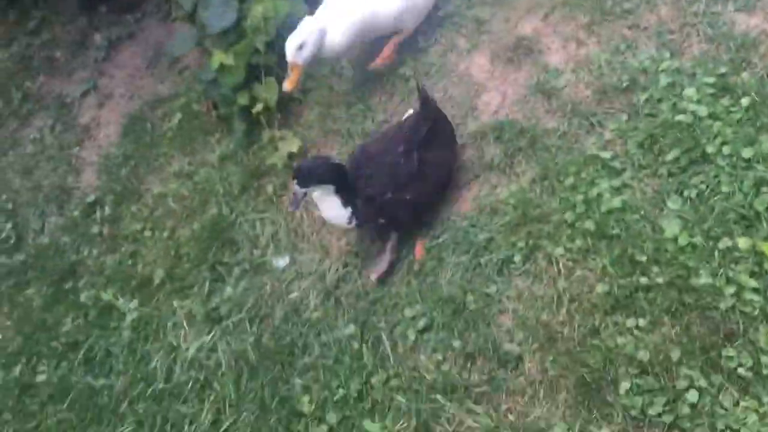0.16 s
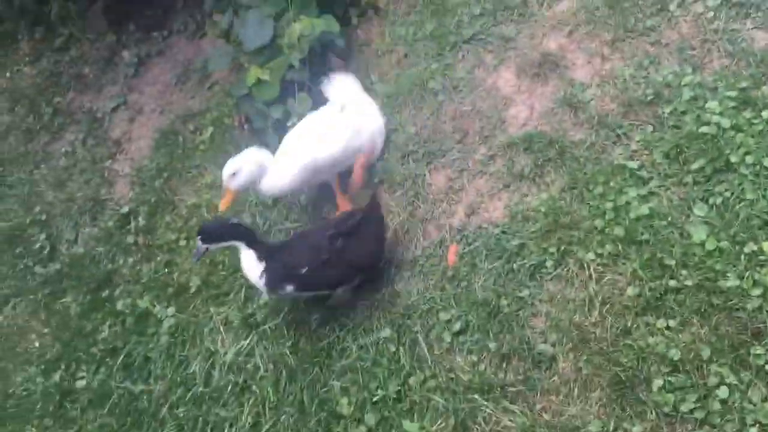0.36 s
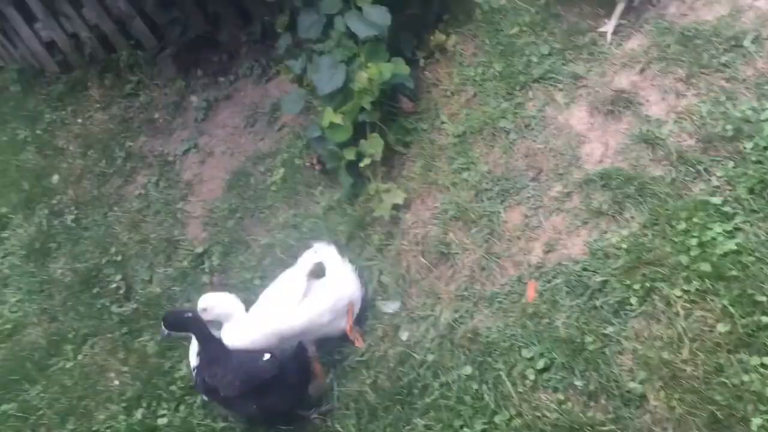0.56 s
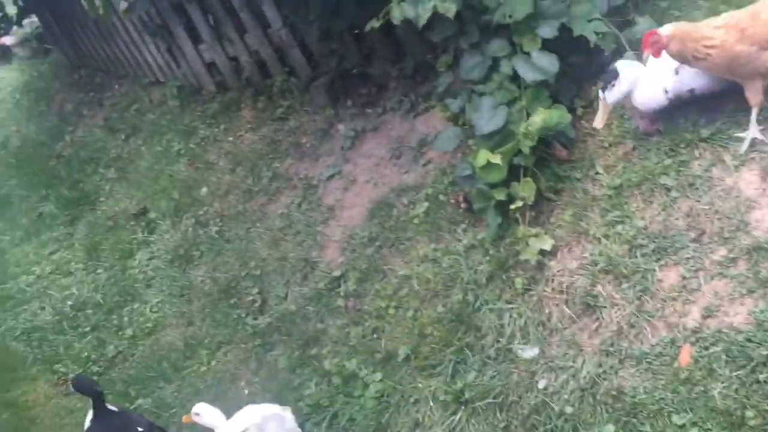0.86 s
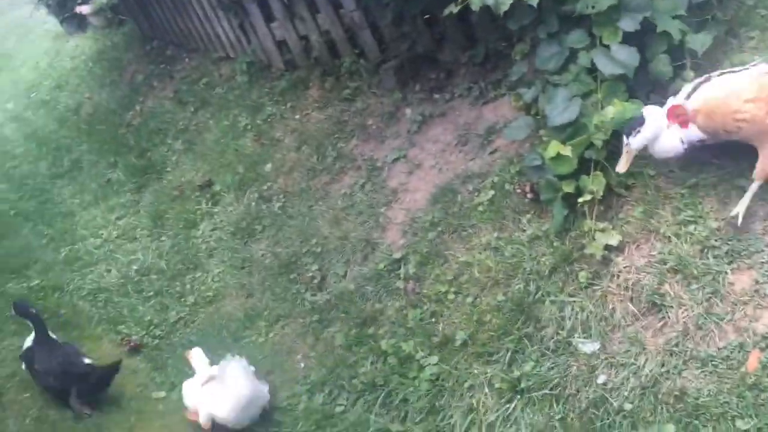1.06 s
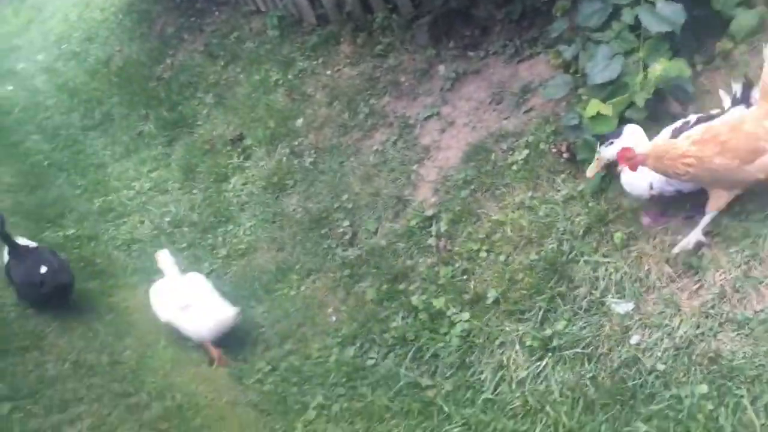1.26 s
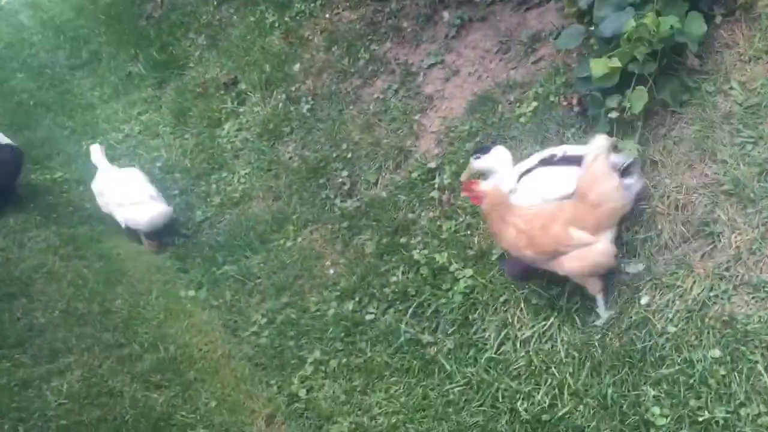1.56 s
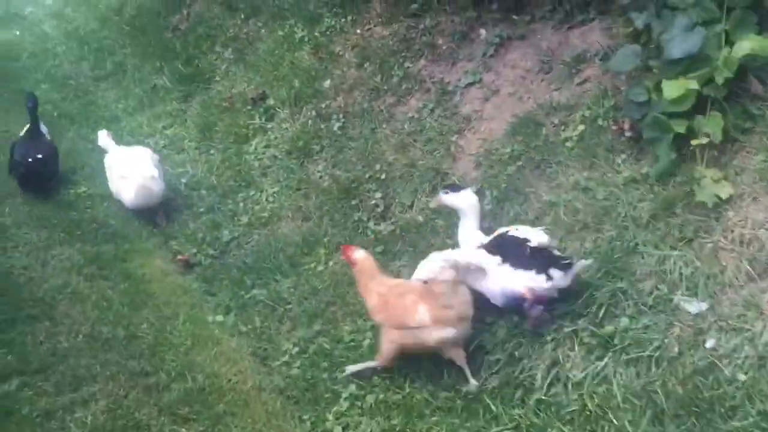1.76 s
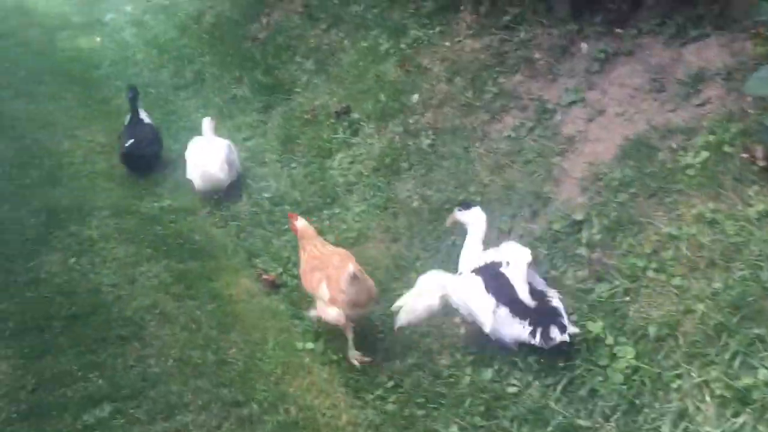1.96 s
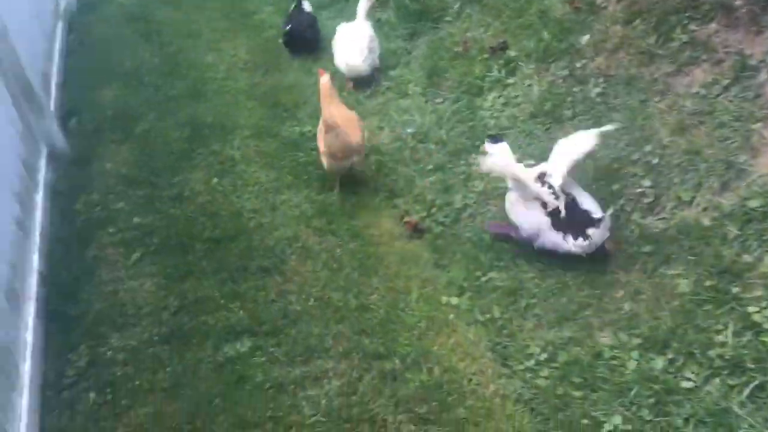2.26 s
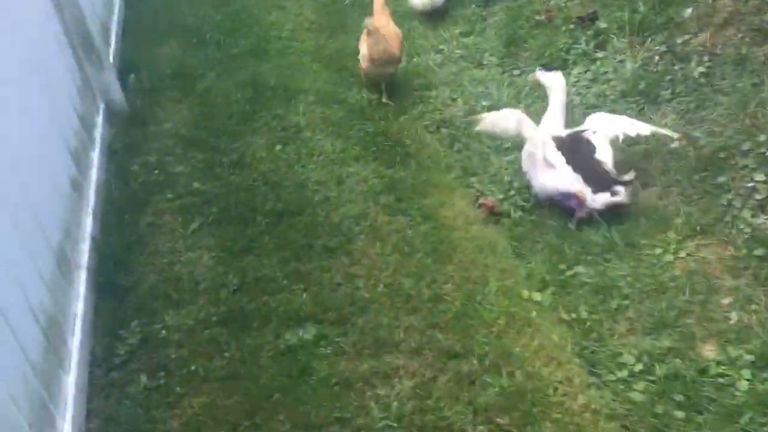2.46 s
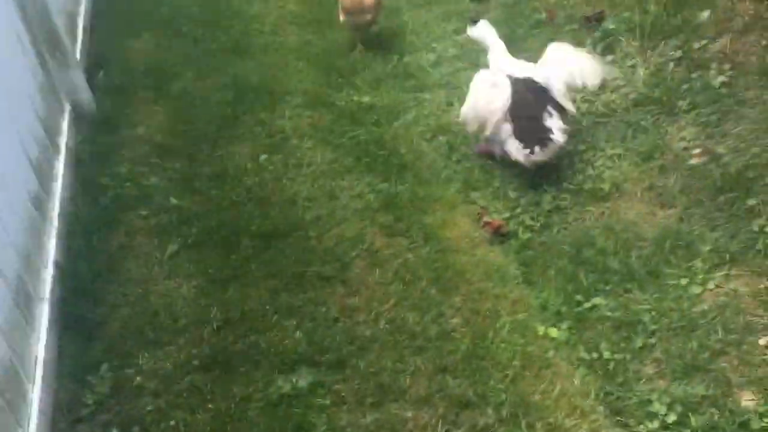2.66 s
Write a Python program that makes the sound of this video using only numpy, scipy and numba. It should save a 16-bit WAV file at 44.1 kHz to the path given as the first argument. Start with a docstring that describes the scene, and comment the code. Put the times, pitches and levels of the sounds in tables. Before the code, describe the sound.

Ducks quack outdoors, one close by in short, regular calls while another answers with longer, harsher ones, mostly in the second half. The hand-held microphone takes a sharp knock at the start, then softer bumps and low rumble.

```python
"""Ducks hurrying across a lawn

Close, from a hand-held phone above the birds. One duck quacks about four times a second; another answers
with longer, harsher calls, and soft rasps, peeps and ticks fall in between. Each quack is a pulse train
ringing throat, nose and bill. The phone is bumped and rumbles as it is carried; a fence and a wall give
a faint echo, over quiet outdoor air."""
import sys
import numpy as np
from scipy import signal
from scipy.fft import rfft, irfft
from scipy.io import wavfile
from scipy.ndimage import uniform_filter1d
from numba import njit

SR = 44100
rng = np.random.default_rng(int(sys.argv[2]) if len(sys.argv) > 2 else 0)


def unload_audio(sound):
    """Save the sound as a 16-bit wav file, at the path given as the first command line argument."""
    columns = np.transpose(np.atleast_2d(sound))
    # keep every value between -1 and 1, then stretch to whole-number steps
    steps = np.round(np.clip(columns, -1, 1) * 32767)
    wavfile.write(sys.argv[1], SR, steps.astype(np.int16))


N = 123479

# hoarse colour of the rasps, the ticks and the air in the peeps (frequency [Hz], gain [dB])
HOARSE_SPECTRUM = [(200, -16), (650, -14.5), (1050, 0.5), (2000, 2.5), (2800, -15.5), (3800, -18),
                   (5500, -37), (9000, -51.5)]


def leading_duck():
    """The near, clear voice: short, regular quacks, each with its own brightness."""
    # (start [s], length [s], top pitch [Hz], level [dB], roughness [0-1], throat resonance [Hz],
    #  open bill against throat [dB], low nasal [Hz], high nasal [Hz], treble tilt [dB/octave])
    quacks = [(.067, 0.053, 226, -27, 0.54, 1650, -9, 4490, 5900, -9.5),
              (.312, .072, 232.8, -28, 0.079, 1715, -16, 4300, 5450, -3),
              (.565, .075, 227.4, -22, 0.53, 1623, -19, 4200, 5750, -7),
              (.819, .083, 238.7, -23.5, 0.27, 1736, -33, 4100, 5600, -2.5),
              (1.082, 0.077, 244.3, -21.5, 0.079, 1760, -15, 4630, 6400, -3.5),
              (1.337, .076, 246.8, -20.5, 0.11, 1666, -10.5, 4430, 5850, 1.5),
              (1.612, 0.076, 251, -23, .2, 1670, -10, 4380, 5350, -5.5),
              (1.873, 0.079, 266.7, -22, 0.14, 1570, 5, 4040, 6050, -3),
              (2.132, 0.069, 261.4, -22.5, 0.13, 1663, 0.5, 4190, 5900, 3),
              (2.414, .079, 267.6, -24, .2, 1768, 3.5, 4470, 6300, 5.5)]
    # voice colour ahead of the resonances (frequency [Hz], gain [dB])
    spectrum = [(120, -36), (240, -1.5), (480, -9.5), (750, -7.5), (1050, -5), (1700, 2), (2700, -7),
                (3150, -16), (3800, -15.5), (4450, -16.5), (5050, -23.5), (5750, -23), (8300, -39.5),
                (10000, -55)]
    out, knee_hz = np.zeros(N), 4000
    for *call, low_hz, high_hz, tilt in quacks:
        voice = [(hz, db + tilt * max(np.log2(hz / knee_hz), 0)) for hz, db in spectrum]
        add(out, call[0], quack(call, voice, throat_width_hz=125, throat_db=14.25, jitter_cycles=.055,
                                breath=.5, attack_s=.011, release_s=.017, arch=(.4, .11, .32),
                                nasal_hz=(low_hz, high_hz), echo_db=-11))
    return out


def answering_ducks():
    """Farther off: a harsh voice with a sharply ringing throat, and a soft, breathy rasp."""
    # both: (start [s], length [s], top pitch [Hz], level [dB], roughness [0-1], throat resonance [Hz],
    #  open bill against throat [dB])
    answers = [(-.04, 0.091, 257, -24.5, 0.81, 1543, -8.5), (1.444, 0.057, 259.5, -25, 0.62, 1577, -9),
               (1.593, 0.048, 247, -25, 0.44, 1473, -8), (1.746, 0.12, 262.4, -23, 0.27, 1588, -5.5),
               (1.937, .187, 282.8, -24, .9, 1652, -3), (2.269, 0.15, 274.5, -23.5, 0.77, 1605, -24.5),
               (2.64, .087, 250.8, -29.5, .9, 1494, -21)]
    rasps = [(.266, 0.053, 150, -44.5, 0.84, 1640, -32), (0.488, .12, 158.5, -37, 0.96, 1640, -2),
             (1.026, 0.11, 163.3, -34, 1, 1654, -11), (1.256, .082, 128.8, -35.5, 0.896, 2010, -16),
             (1.725, 0.031, 169, -32, 0.93, 1500, -23.5)]
    # colour of the harsh voice (frequency [Hz], gain [dB])
    harsh_spectrum = [(120, -23.5), (270, -4.5), (550, -13.5), (780, -11.5), (1050, 3.5), (1270, -11),
                      (1750, 0), (2600, -21.5), (3200, -17.5), (4200, -28.5), (5500, -37.5), (10000, -56.5),
                      (15000, -64)]
    out = np.zeros(N)
    for call in answers:
        add(out, call[0], quack(call, harsh_spectrum, throat_width_hz=97, throat_db=19.4,
                                jitter_cycles=.1, breath=.7, attack_s=.016, release_s=.023))
    for call in rasps:
        add(out, call[0], quack(call, HOARSE_SPECTRUM, throat_width_hz=610, throat_db=15.4,
                                jitter_cycles=.14, breath=.75, attack_s=.025, release_s=.0055))
    return out


def quack(call, voice, throat_width_hz, throat_db, jitter_cycles, breath, attack_s, release_s,
          arch=(.45, .08, .12), nasal_hz=(2680, 4105), echo_db=-3):
    """Uneven pulses on an arch of pitch ring the throat, the nose and the closing bill."""
    _, length, top_hz, db, rough, throat_hz, bill_db = call
    crest, rise, fall = arch  # crest as a share of the call; shares of pitch gained before, lost after
    t = np.arange(12288) / SR
    progress = np.clip(t / length, 0, 1)
    before_crest = np.maximum(1 - progress / crest, 0)
    after_crest = np.maximum((progress - crest) / (1 - crest), 0)
    bend = 1 - rise * before_crest ** 2 - fall * after_crest ** 2
    source = voice_pulses(top_hz * bend, length, jitter_cycles * rough, breath * rough,
                          shimmer_db=2.5 * rough)
    effort = np.clip(t / attack_s, 0, 1) * np.clip((length - t) / release_s, 0, 1)
    x = colour(effort * source, voice)
    dull = signal.sosfilt(signal.butter(1, 2800, fs=SR, output="sos"), x)
    x = dull + undb(-7.5 * (2 * progress - 1) ** 2) * (x - dull)  # less treble in the swell and taper
    bill_open = 1 / (1 + np.exp((t / length - .72) * 10))  # half shut at 72% of the call
    sag = bend ** .4  # the resonances partly follow the pitch
    throat = ring(x, throat_hz * sag, float(throat_width_hz))
    bill = ring(x * bill_open, 2390 * sag, width_hz=300.)
    nasal = sum(ring(x, hz * np.sqrt(sag), width_hz=165.) for hz in nasal_hz)
    voiced = x + undb(throat_db) * (throat + undb(bill_db) * bill) + undb(5) * nasal
    heard = ground_scatter(voiced, echo_db)
    return unit(heard) * np.sqrt(length * SR / len(t)) * undb(db)


def voice_pulses(pitch_hz, length_s, jitter_cycles, breath, shimmer_db):
    """One pulse a cycle, uneven in time and strength, each with a puff of air."""
    size, count = len(pitch_hz), 80
    late, strong = rng.standard_normal((2, count))
    cycles = np.arange(count) + .5 + jitter_cycles * late
    times = np.interp(cycles, np.cumsum(pitch_hz) / SR, np.arange(size) / SR)
    pulses = np.zeros(size)
    for when, gain in zip(times[times < length_s] * SR, undb(shimmer_db * strong)):
        near = np.arange(max(int(when) - 10, 0), int(when) + 10)
        pulses[near] += gain * np.sinc(near - when) * np.sinc((near - when) / 10)
    puff_power = signal.lfilter([1], [1, -np.exp(-1 / (SR * .0019))], pulses ** 2)
    puffs = np.sqrt(puff_power) * rng.standard_normal(size)
    return unit(pulses) + breath * unit(puffs)


def peeps():
    """Faint, hoarse falling whistles wrapped in air."""
    # (start [s], length [s], first pitch [Hz], last pitch [Hz], level [dB])
    calls = [(.018, 0.016, 1000, 980, -24.5), (.027, 0.055, 1016, 738, -36), (0.398, 0.045, 1116, 794, -39),
             (.772, .025, 1220, 1020, -34)]
    out = np.zeros(N)
    for start, length, first_hz, last_hz, db in calls:
        n = int(length * SR)
        progress = np.linspace(0, 1, n)
        hz = (first_hz + (last_hz - first_hz) * progress) * (1 + .07 * drift(530)[:n])
        whistle = undb(4 * drift(400)[:n]) * np.sin(2 * np.pi * np.cumsum(hz) / SR)
        air = undb(-7) * noise(N // 10, HOARSE_SPECTRUM)[:n]
        add(out, start, undb(db) * np.sin(np.pi * progress) * (whistle + air))
    return out


def ticks():
    """Small dry clicks, perhaps of bills."""
    # (time [s], level [dB])
    clicks = [(.719, -40), (2.613, -38.5), (2.794, -32)]
    out, t = np.zeros(N), np.arange(SR // 10) / SR
    for start, db in clicks:
        add(out, start, undb(db) * np.exp(-t / .0076) * noise(len(t), HOARSE_SPECTRUM))
    return out


def phone_bumps():
    """Knocks on the phone sink quickly to a low boom; the sharper ones click more."""
    # (time [s], level [dB], sharpness as extra starting pitch [Hz], decay [s])
    bumps = [(0.099, -19, 100, 0.036), (0.1446, 6, 583, 0.012), (1.301, -23.5, 78, 0.016),
             (1.421, -22.5, 30.4, 0.019), (1.888, -18, 58.3, 0.019), (2.216, -19, 49, 0.026),
             (2.469, -23, 68.7, 0.03), (2.549, -17, 364, 0.012), (2.676, -18, 70, 0.023)]
    click_spectrum = [(500, 22), (1400, -32), (4000, -19.5), (14000, -42.5)]  # (frequency [Hz], gain [dB])
    boom_hz, settle_s = 67.2, .00269
    out, t = np.zeros(N), np.arange(SR // 5) / SR
    for start, db, sharp_hz, decay_s in bumps:
        hz = boom_hz + sharp_hz * np.exp(-t / settle_s)
        envelope = (1 - np.exp(-t / .0015)) * np.exp(-t / decay_s)
        boom = -np.sin(2 * np.pi * np.cumsum(hz) / SR) * envelope
        click = noise(len(t), click_spectrum) * np.exp(-t / .0058)
        add(out, start, undb(db) * boom)
        add(out, start - .0012, undb(db - 28) * sharp_hz / boom_hz * click)
    return out


def carrying_rumble():
    """Low, swaying handling noise from the carried phone."""
    # level that the rumble sways about (time [s], level [dB])
    levels = [(0, -39), (.5, -45.5), (2.8, -39.5)]
    # rumble colour (frequency [Hz], gain [dB])
    spectrum = [(20, -37.5), (45, -3), (68, -1.5), (110, -12), (200, -21), (400, -28.5), (900, -64)]
    carried_db = np.interp(np.arange(N) / SR, *np.array(levels).T)
    return undb(carried_db + 2.5 * drift(14)) * noise(N, spectrum)


def ground_scatter(x, echo_db, decay_s=.01):
    """A bounce off the ground and quick reflections, different at every spot the bird calls from."""
    t = np.arange(len(x)) / SR
    lag_s = rng.uniform(.0006, .0012)
    x = x + undb(-10) * np.interp(t - lag_s, t, x, left=0)
    echoes = rng.standard_normal(len(x)) * (1 - np.exp(-t / .0019)) * np.exp(-t / decay_s)
    return x + undb(echo_db) * signal.fftconvolve(x, echoes / np.linalg.norm(echoes))[:len(x)]


def yard_echo(x, t60_s=.19, echo_db=-24.5):
    """A faint tail from fence and wall, reaching the microphone 15 ms late."""
    t = np.arange(SR // 2) / SR
    tail = rng.standard_normal(len(t)) * (t > .015) * undb(-60 * t / t60_s)
    return x + undb(echo_db) * signal.fftconvolve(x, tail / np.linalg.norm(tail))[:N]


def outdoor_air():
    """A quiet midrange hush over the lawn, wavering by about a decibel."""
    # colour of the hush (frequency [Hz], gain [dB])
    spectrum = [(400, -14), (900, 5.5), (1700, 2.5), (3000, -11.5), (6000, -25), (10000, -37), (15000, -34)]
    return undb(-55 + drift(3.6)) * noise(N, spectrum)


def undb(db):
    return 10 ** (np.asarray(db) / 20)


def unit(x):
    return x / np.sqrt(np.mean(x ** 2) + 1e-18)


def add(out, start_s, x):
    """Mix a sound in at its time."""
    i = int(round(start_s * SR))
    x = x[max(-i, 0):max(N - i, 0)]
    out[max(i, 0):max(i, 0) + len(x)] += x


def colour(x, points):
    """Minimum-phase filter through (frequency [Hz], gain [dB]) points."""
    size = 4096
    hz, db = np.array(points).T
    bins_hz = np.maximum(np.arange(size // 2 + 1) * SR / size, 1)
    gain = undb(np.interp(np.log(bins_hz), np.log(hz), db))
    cepstrum = irfft(np.log(gain))
    cepstrum[1:size // 2] *= 2
    cepstrum[size // 2 + 1:] = 0
    return signal.fftconvolve(x, irfft(np.exp(rfft(cepstrum))))[:len(x)]


def noise(n, spectrum):
    """Coloured noise at unit RMS."""
    return unit(colour(rng.standard_normal(n), spectrum))


@njit
def ring(x, hz, width_hz):
    """One moving resonance, gain 1 at its centre."""
    y, band, low = np.empty(len(x)), 0., 0.
    for i in range(len(x)):
        g, damping = np.tan(np.pi * hz[i] / SR), width_hz / hz[i]
        v = (band + g * (x[i] - low)) / (1 + g * (g + damping))
        band, low, y[i] = 2 * v - band, low + 2 * g * v, damping * v
    return y


def drift(rate_hz):
    """Smooth random wander at unit RMS."""
    hold = int(SR / rate_hz)
    steps = np.repeat(rng.standard_normal(N // hold + 1), hold)
    return unit(uniform_filter1d(uniform_filter1d(steps, hold), hold)[:N])


def scene():
    """The birds in the yard, handling noise and air, in mono."""
    air = outdoor_air()
    birds = leading_duck() + answering_ducks() + peeps() + ticks()
    return (yard_echo(birds) + phone_bumps() + carrying_rumble() + air)[None]


def record(dry):
    """The phone rounds the loudest peak and cuts the top."""
    ceiling, top_hz = .75, 15800
    rounded = dry / (1 + np.abs(dry / ceiling) ** 4) ** .25
    return signal.sosfilt(signal.ellip(8, .2, 70, top_hz, fs=SR, output="sos"), rounded)


dry = scene()
out = record(dry)
unload_audio(out)
```